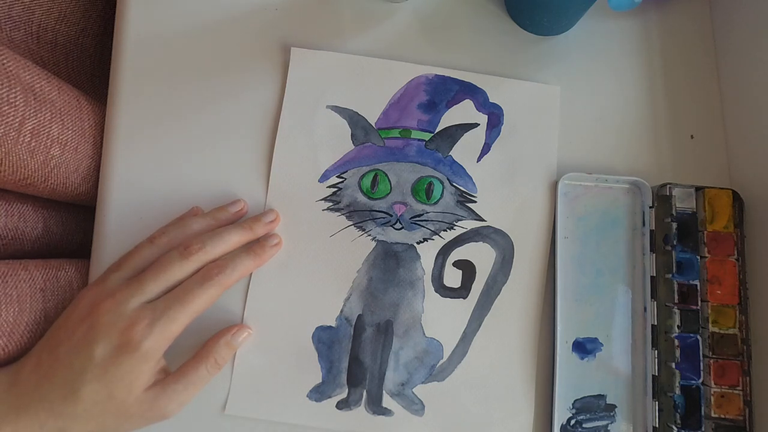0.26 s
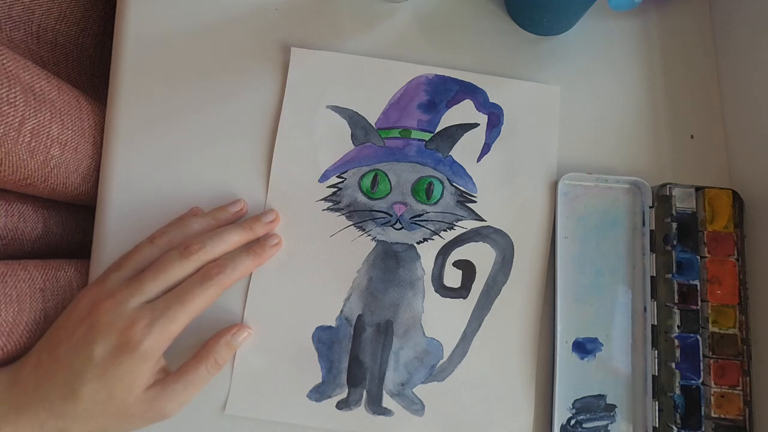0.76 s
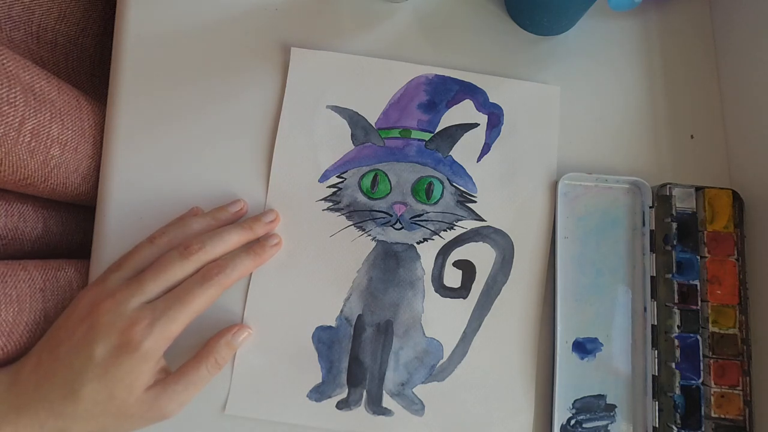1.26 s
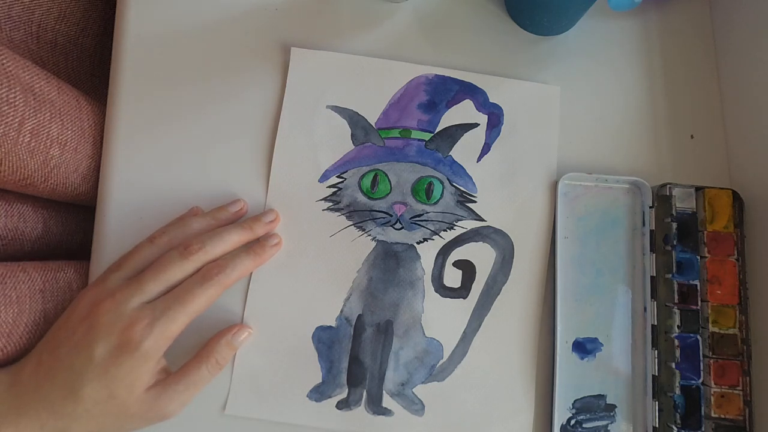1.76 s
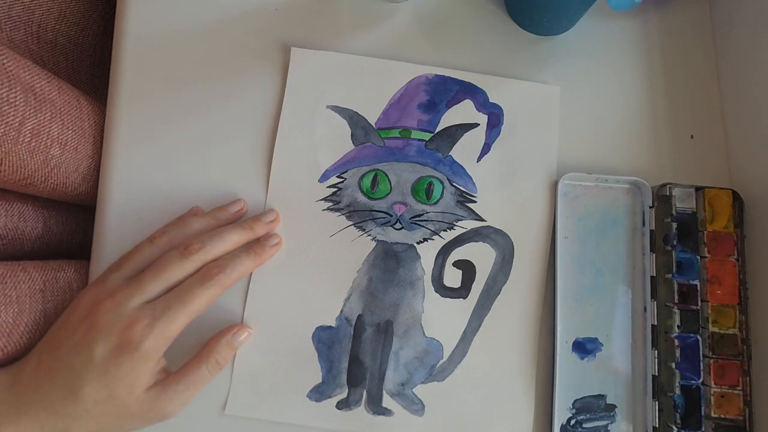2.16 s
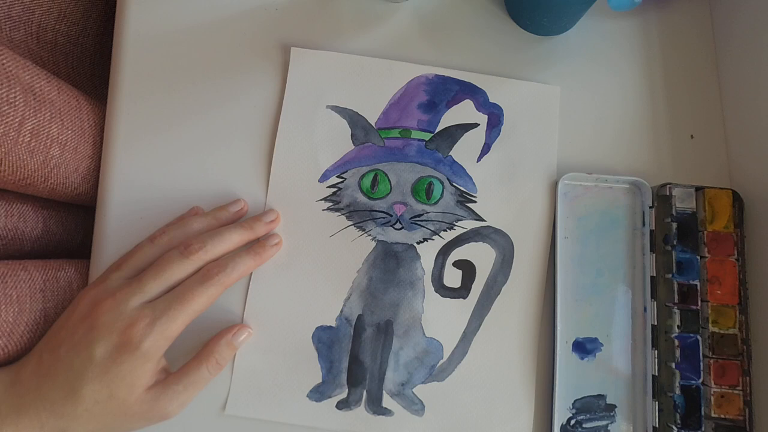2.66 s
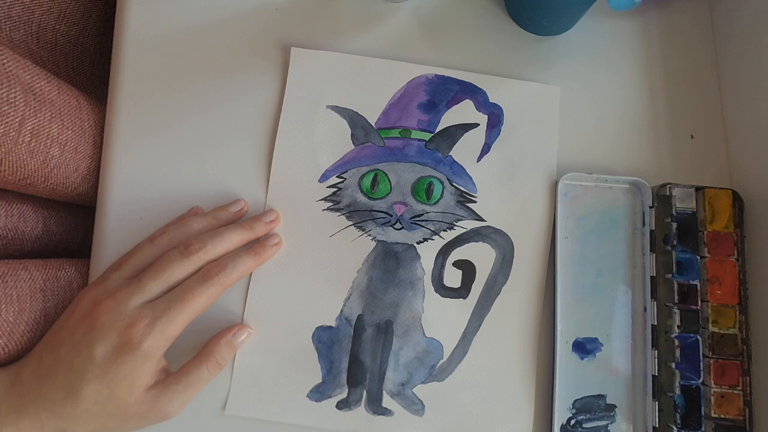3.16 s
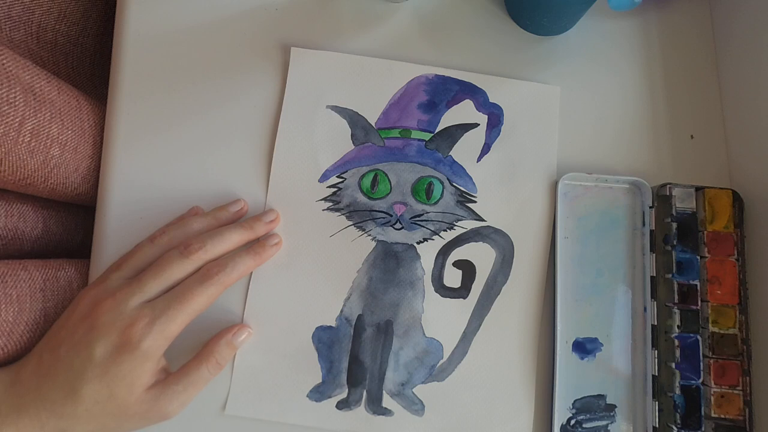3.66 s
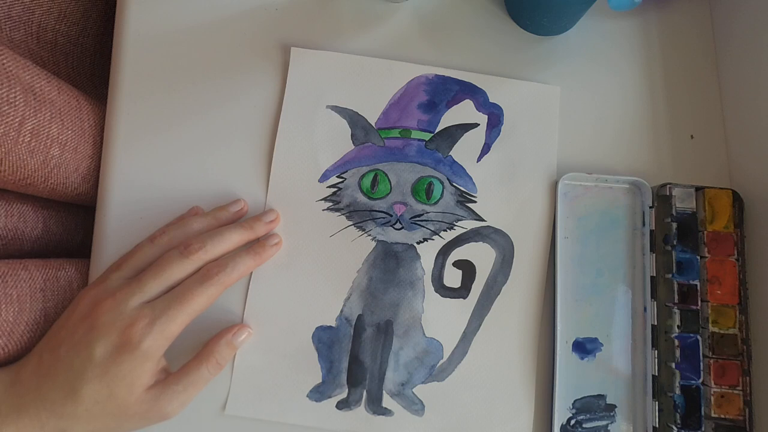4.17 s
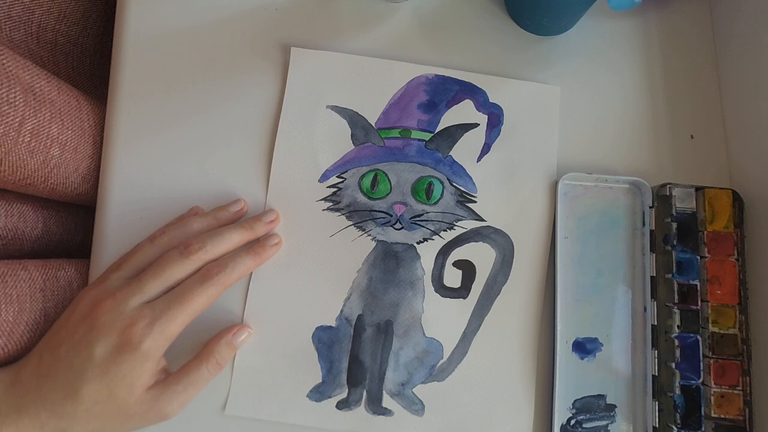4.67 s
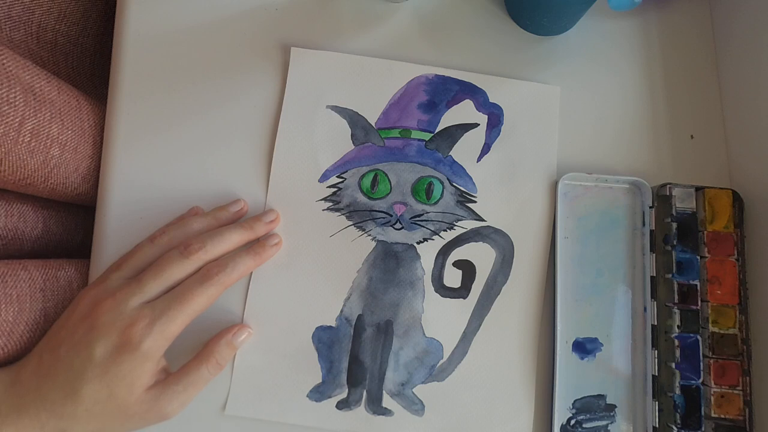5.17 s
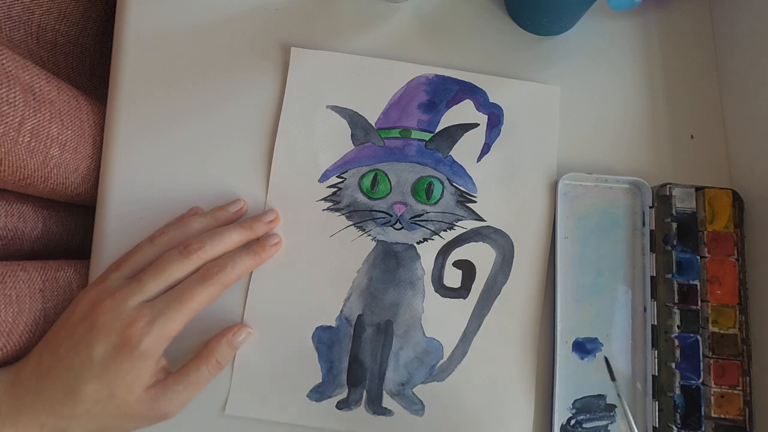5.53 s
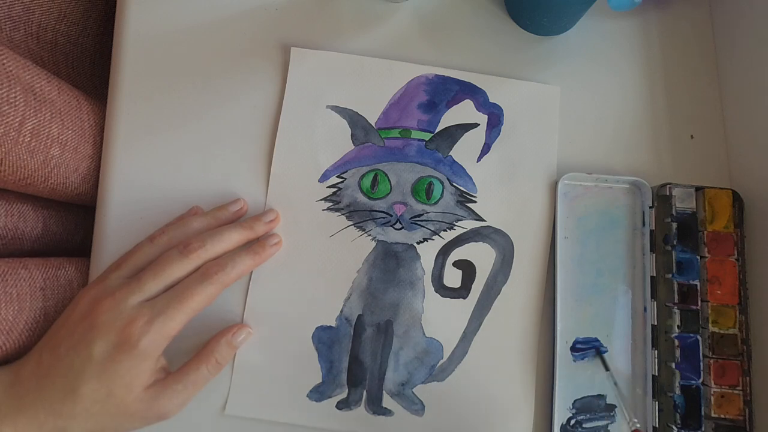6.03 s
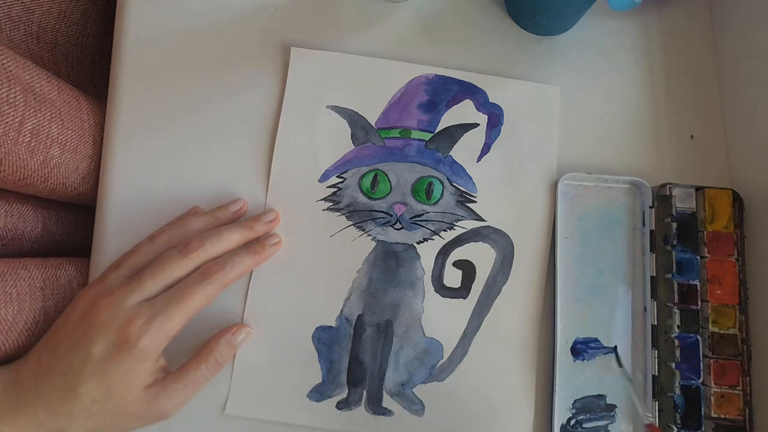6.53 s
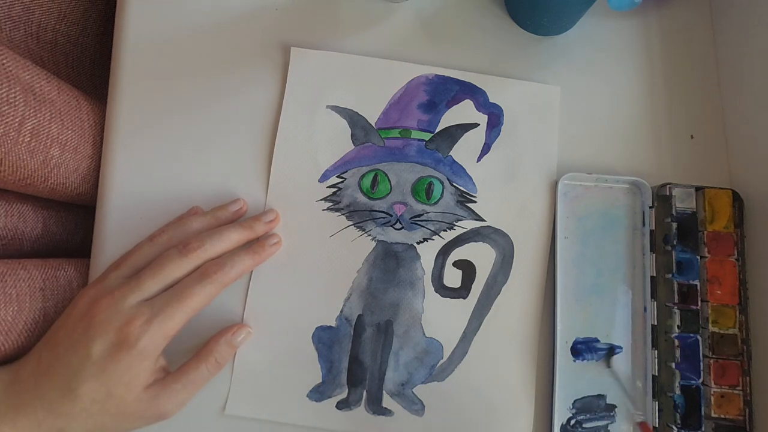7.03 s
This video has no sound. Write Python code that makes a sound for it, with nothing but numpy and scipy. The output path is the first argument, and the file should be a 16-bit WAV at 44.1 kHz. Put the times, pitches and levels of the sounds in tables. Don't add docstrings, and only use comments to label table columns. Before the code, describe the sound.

Close above a desk in a quiet room with a faint fan and low rumble, a sleeve rubs, then a paintbrush stirs in a glass water jar with tiny bubbles and ticks. Sharp bright clinks strike the rim, with soft desk bumps. After a lull, the wet brush dabs evenly on a hollow plastic paint-box lid.

```python
import sys
import numpy as np
from scipy import signal
from scipy.fft import rfft, irfft, next_fast_len
from scipy.io import wavfile
from scipy.ndimage import map_coordinates

SR = 44100
rng = np.random.default_rng(int(sys.argv[2]) if len(sys.argv) > 2 else 0)


def ratio_of_db(decibels):
    return 10 ** (np.asarray(decibels, float) / 20)


def store_wav(level_fs):
    pcm = np.round(np.clip(np.atleast_2d(level_fs), -1, 1) * 32767)
    wavfile.write(sys.argv[1], SR, pcm.T.astype(np.int16))


N = 321930
CLOCK = np.arange(N) / SR
T = np.arange(SR // 2) / SR
SPOTS = 5

# (frequency [Hz], level [dB per Hz])
CRACK_SPECTRUM = [(300, -27.5), (1500, -43), (3000, -14), (5000, -6.5), (6300, -11.5), (8000, -10),
                  (12000, -15.5), (13800, -18.5), (15000, -16.5), (16500, -46.5), (17000, -92)]
# (frequency [Hz], level [dB], t60 [s])
LOWEST_RINGS = [(1472, -33.5, 0.17), (2345, -26, 0.35), (3494, -3, 0.42), (3560, -15, 0.12)]
SECOND_RINGS = [(2600, -27, .26), (3755, -23, .35), (4902, -3.5, 0.33), (4924, -11, .15), (5066, -11, .12),
                (5218, -11, 0.1), (6056, -24, 0.26), (7219, -30, .25)]
HIGH_RINGS = [(7860, 0, 0.05), (8880, -4.5, 0.036), (9590, 3, 0.057), (9400, -14.5, 0.22),
              (11400, -16.5, 0.11), (11250, -10, 0.077), (13090, -16, .09), (14780, -20.5, 0.067)]


def unit(x):
    return x / np.sqrt(np.mean(x ** 2) + 1e-20)


def along(points, hz):
    f, v = np.transpose(points)
    return np.interp(np.log(hz + 1), np.log(f + 1), v)


def curve(rows):
    s, db = np.transpose(rows)
    return ratio_of_db(np.interp(CLOCK, s, db, left=-140, right=-140))


def wobble(rate):
    knots = rng.standard_normal(int(N * rate / SR) + 4)
    return map_coordinates(knots, [np.arange(N) * rate / SR])


def noise(gain, count=N):
    m = next_fast_len(count + 4096)
    spectrum = rfft(rng.standard_normal(m)) * gain(np.fft.rfftfreq(m, 1 / SR))
    return unit(irfft(spectrum, m)[:count])


def peak(hz, width_hz):
    return lambda f: np.exp(-((f - hz) / width_hz) ** 2)


def tent(t, peak_s, rise_db_s, fall_db_s):
    return ratio_of_db(np.minimum(rise_db_s * (t - peak_s), fall_db_s * (peak_s - t)))


def ring(hz, db, t60, attack=0.00018):
    return ratio_of_db(db - 60 * T / t60) * np.sin(2 * np.pi * hz * T) * (1 - np.exp(-T / attack))


def puff(gain, t60, attack=0.0001):
    burst = np.pad(noise(gain, count=4000), (0, len(T) - 4000))
    return burst * ratio_of_db(-60 * T / t60) * (1 - np.exp(-T / attack))


def silent_spots():
    return np.zeros((SPOTS, N + SR))


def add(track, s, sound):
    track[rng.integers(SPOTS), round(s * SR):][:len(T)] += sound


def air_hiss():
    # (frequency [Hz], level [dB per Hz])
    floor = [(26, -17), (48, -4.5), (70, -10.5), (110, -15.5), (185, -19.5), (350, -28), (540, -30.5),
             (1500, -36), (3400, -38.5), (9000, -38.5), (15400, -43.5), (15700, -82.5)]
    return ratio_of_db(-67.5 + .4 * wobble(1.4)) * noise(lambda f: ratio_of_db(along(floor, f)))


def fan():
    # (frequency [Hz], width [Hz], level [dB], unsteadiness [dB])
    rattle = [(4070, 340, -83.5, 0.5), (8700, 700, -95, 10), (11500, 600, -98, 9)]
    phase = 2 * np.pi * CLOCK
    hum = ratio_of_db(-68.0 + .8 * wobble(4.1)) * np.sin(129 * phase + .5 * wobble(13))
    turn = ratio_of_db(4.3 * np.cos(32.5 * phase + 1.5 * wobble(4)))
    flutter = 1.5 * np.tanh(wobble(22) / 1.5 - .3)
    whir = sum(ratio_of_db(db + loose_db * flutter) * noise(peak(hz, width_hz))
               for hz, width_hz, db, loose_db in rattle)
    return hum + turn * whir


def building():
    # (time [s], level [dB])
    swell = [(0, -57.5), (.3, -60), (.6, -67), (1.5, -62.5), (1.95, -60), (2.3, -59), (2.64, -62.5),
             (2.74, -53.5), (3.24, -62), (3.38, -50), (3.76, -60.5), (3.98, -55), (4.24, -58), (4.5, -47.5),
             (4.9, -65.5), (5.5, -60), (6.8, -59), (7.3, -68.5)]
    drone = .85 * np.sin(33.5 * 2 * np.pi * CLOCK + .8 * wobble(2.5))
    rumble = .4 * noise(peak(30, 13)) + .45 * noise(peak(8, 8))
    return curve(swell) * ratio_of_db(3.0 + 1.1 * wobble(4.1)) * (drone + rumble)


def arm():
    settling = tent(CLOCK, peak_s=0.85, rise_db_s=103, fall_db_s=73)
    rub = noise(lambda f: peak(150, 75)(f) + 0.1 * peak(400, 200)(f))
    return ratio_of_db(-58) * settling * unit(ratio_of_db(4.2 * wobble(30)) * rub)


def wipes():
    # (time [s], level [dB], frequency [Hz], fade [dB/s])
    slides = [
        (5.5, -80.5, 3000, 39.5),
        (5.84, -71.5, 8000, 201),
    ]
    out = np.zeros(N)
    for s, db, hz, fade in slides:
        grain = ratio_of_db(db + 3.3 * wobble(43))
        out += grain * tent(CLOCK, s, fade, fade) * noise(peak(hz, hz))
    return out


def desk():
    # (time [s], low level [dB], middle level [dB], high level [dB], share of ring time [0-1])
    contacts = [(1.718, -60, -91, -74.5, 0.4), (1.839, -48.5, -90, -75, 0.1), (1.925, -54, -60, -77, 0.3),
                (2.023, -63, -83, -70, 0.17), (2.19, -49.5, -82, -66, 0.08), (2.619, -56, -79, -99, 0.46),
                (2.802, -37, -41.5, -52, 0.07), (2.983, -43.5, -52.5, -59, 0.27),
                (3.285, -35, -43.5, -72.5, 0.3), (3.648, -48.5, -44, -68, 0.5), (3.695, -47, -53, -76, 0.3),
                (4.026, -58.5, -54.5, -71, 0.48), (4.451, -51.5, -54, -49.5, 1),
                (4.735, -69, -66.5, -82.5, 0.55), (5.003, -76.5, -76, -70, 0.76),
                (5.013, -74, -67, -75, 0.84), (5.821, -70, -66.5, -73.5, .6)]
    # (frequency [Hz], level [dB], t60 [s])
    wood_modes = [(203, -6, 0.04), (278.6, 6.5, 0.045), (404, 5.5, 0.061), (492, -10.5, 0.22),
                  (823.5, -8, 0.16)]
    out = silent_spots()
    for s, low_db, middle_db, high_db, share in contacts:
        wood = sum(ring(hz, level + low_db - 3 + rng.normal(0, 1.7), share * t60, attack=0.002)
                   for hz, level, t60 in wood_modes)
        knock = ratio_of_db(middle_db - 3.5) * puff(peak(1500, 1800), 0.049, attack=0.00049)
        tick = ratio_of_db(high_db + 6) * puff(peak(8000, 4500), 0.036)
        add(out, s, wood + knock + tick)
    return out


def lid():
    # (time [s], level [dB])
    dabs = [
        (6.003, -51.5),
        (6.169, -52.5),
        (6.332, -50),
        (6.499, -49.5),
        (6.655, -45),
        (6.809, -47),
        (6.972, -48.5),
        (7.131, -47),
        (7.291, -46.5),
    ]
    # (frequency [Hz], level [dB], t60 [s])
    body_modes = [(313, -0.5, 0.07), (402, 6, 0.026), (477, 0.5, 0.05), (532, -5.5, 0.082),
                  (687, -8, 0.047), (733, -8, 0.027)]
    top_modes = [(1340, 5, 0.033), (1613, -1, 0.057), (2055, 10.5, .015), (2710, -15.5, .01),
                 (4870, 5, 0.01)]
    bright_db = -16.5
    out = silent_spots()
    for s, db in dabs:
        boom = sum(ring(hz, level + rng.normal(0, .9), t60, attack=0.0015)
                   for hz, level, t60 in body_modes)
        tick = sum(ring(hz, level + bright_db + rng.normal(0, 0.65), t60)
                   for hz, level, t60 in top_modes)
        splat = ratio_of_db(-4) * puff(peak(535, 294), 0.055, attack=0.002)
        splat += ratio_of_db(bright_db - 0.5) * puff(peak(1560, 2800), 0.089)
        late_boom = np.roll(boom, 50)
        add(out, s + .0006, ratio_of_db(db - 4.5) * (late_boom + tick + splat))
    return out


def water():
    # (time [s], level [dB], frequency [Hz])
    bubbles = [(1.931, -62, 1427), (2.004, -68.5, 1344), (2.079, -51, 1534), (2.08, -59, 1340),
               (2.114, -50, 1380), (2.114, -61.5, 2010), (2.115, -63, 1486), (2.133, -62, 1340),
               (2.237, -48.5, 1550), (2.239, -54.5, 1414), (2.264, -66, 1650), (2.28, -64, 1590),
               (2.302, -60, 1556), (2.324, -58.5, 1550), (2.326, -61, 1340), (2.325, -61, 1870),
               (2.348, -59.5, 1628), (2.374, -65, 1690), (2.384, -62, 1764), (2.39, -67, 1410),
               (2.402, -63, 1884), (2.429, -71, 1750)]
    out = silent_spots()
    for s, db, hz in bubbles:
        t60 = 0.073 * (1500 / hz) ** 1.5
        tremble = .75 * noise(peak(0, 70), len(T))
        phase = 2 * np.pi * hz * (T + .5 * T ** 2) + tremble
        add(out, s, ratio_of_db(db - 60 * T / t60) * (1 - np.exp(-T / 0.0024)) * np.sin(phase))
    return out


def wall(family):
    return sum(ring(hz, level + rng.normal(0, 0.5), t60) for hz, level, t60 in family)


def rocking_jar():
    # (time [s], level [dB], split [Hz], t60 [s])
    swells = [
        (2.97, -63, 1.5, .5),
        (3.745, -62, 3.6, .48),
    ]
    hz = 4902
    out = silent_spots()
    for s, db, split_hz, t60 in swells:
        first = ring(hz, db, t60, attack=.01)
        second = ring(hz + split_hz, db - 2, t60, attack=.01)
        add(out, s, first + second)
    return out


def slips():
    # (time [s], low rings [dB], high rings [dB])
    scrapes = [
        (2.876, -39, -59.5),
        (2.96, -81, -56.5),
    ]
    run_up_s, slope_db_s = 0.1, 352
    grip = ratio_of_db(-60 * T / .2)
    grit = rng.standard_normal(len(T)) * (rng.random(len(T)) < .06)
    scratch = ratio_of_db(17.5) * puff(lambda f: ratio_of_db(along(CRACK_SPECTRUM, f)), 0.0035)
    low = grip * (wall(SECOND_RINGS) + 0.2 * wall(LOWEST_RINGS))
    high = wall(HIGH_RINGS) + scratch
    push = grit * ratio_of_db(-16.5) * tent(T, run_up_s, slope_db_s, slope_db_s)
    out = silent_spots()
    for s, low_db, high_db in scrapes:
        glass = ratio_of_db(low_db) * low + ratio_of_db(high_db) * high
        add(out, s - run_up_s, signal.fftconvolve(push, glass)[:len(T)])
    return out


def single_modes():
    # (time [s], level [dB], frequency [Hz])
    touches = [(1.916, -51, 3210), (2.004, -63.5, 2580), (2.082, -54, 10350), (2.118, -63, 7560),
               (2.196, -53, 4936), (2.197, -58, 6800), (2.230, -53.5, 3494), (2.232, -56, 4230),
               (2.259, -51.5, 8880), (2.261, -62, 9590), (2.337, -57, 8500), (2.351, -61, 3494),
               (2.367, -71, 10100), (2.380, -67, 8880), (2.391, -60, 8880), (2.417, -64, 10600),
               (2.429, -64, 4530), (2.428, -64, 9000), (2.457, -68, 8880), (2.468, -68, 6900),
               (2.534, -66, 8840), (2.538, -71.5, 3494), (4.4515, -54, 5085), (4.454, -49, 5250),
               (4.736, -67, 5280), (5.006, -64, 5200)]
    # (frequency [Hz], t60 [s])
    held_wall = [(3250, .035), (3494, .13), (4300, 0.036), (4905, 0.15), (5150, 0.045), (7000, 0.017),
                 (8900, 0.044), (10300, 0.017)]
    # (time [s], level [dB], frequency [Hz], t60 [s])
    favoured = [(1.938, -41, 11130, 0.023), (2.801, -57, 13090, 0.11), (2.803, -39, 9590, .1),
                (2.804, -39.5, 8880, 0.11), (3.285, -46, 9590, 0.066), (3.289, -49, 11250, 0.16),
                (3.6504, -29.5, 8880, 0.061), (3.6489, -35, 9590, 0.062), (3.652, -44, 5055, .09),
                (3.697, -28.5, 9590, 0.051), (2.938, -59, 8880, .2), (4.453, -61.5, 404, 0.29)]
    held = [(s, db, hz, along(held_wall, hz)) for s, db, hz in touches]
    out = silent_spots()
    for s, db, hz, t60 in list(favoured) + held:
        contact = ratio_of_db(db - 2.5) * puff(peak(hz, 0.27 * hz), 0.01497)
        add(out, s, ring(hz, db, t60) + contact)
    return out


def blows():
    # (time [s], crack [dB], then against the crack: lowest ring, second ring, high rings [dB])
    knocks = [
        (1.9251, -25, -38.5, -15.5, -41),
        (2.8007, -16.5, -17.5, -12, -25),
        (3.2851, -16, -27, -17, -36),
        (3.6484, -12.5, -48, -32.5, -13),
        (3.6944, -19, -50.5, -19.5, -25.5),
    ]
    # (delay [s], level [dB])
    bounce = [(0, 1), (.0008, -12), (.0034, -8.5), (.006, -15.5)]
    f = np.fft.rfftfreq(2048, 1 / SR)
    lead_s = 40 / SR
    echoes = sum(ratio_of_db(level) * np.exp(-2j * np.pi * f * (lag + lead_s)) for lag, level in bounce)
    out = silent_spots()
    for s, db, low_db, second_db, high_db in knocks:
        bright = peak(9000 + 43 * (low_db + 49.5), 2200)
        colour = lambda hz: ratio_of_db(along(CRACK_SPECTRUM, hz)) * (.6 + 2.4 * bright(hz))
        snap = irfft(colour(f) * echoes)[:900]
        crack = ratio_of_db(-12.5) * puff(colour, 0.032)
        crack[:len(snap)] += ratio_of_db(5.5) * snap / np.abs(snap).max()
        rings = ratio_of_db(low_db) * wall(LOWEST_RINGS) + ratio_of_db(second_db) * wall(SECOND_RINGS)
        rings += ratio_of_db(high_db) * wall(HIGH_RINGS)
        foot_thud = ring(305, -35, 0.058)
        add(out, s - lead_s, ratio_of_db(db) * (rings + foot_thud + crack))
    return out


def walls(spots, wet_db):
    # (frequency [Hz], t60 [s])
    decay = [(200, 0.37), (1500, 0.38), (5000, 0.33), (10000, 0.21), (16000, 0.31)]
    hz, t, z = signal.stft(rng.standard_normal((SPOTS, len(T))), SR, nperseg=256)
    tails = signal.istft(z * ratio_of_db(-60 * t / along(decay, hz)[:, None]), SR, nperseg=256)[1]
    tails = np.pad(tails / np.linalg.norm(tails[0]), ((0, 0), (130, 0)))
    wet = signal.fftconvolve(spots, tails, axes=1)[:, :N]
    return (spots[:, :N] + ratio_of_db(wet_db) * wet).sum(0)


def scene():
    room = air_hiss() + fan() + building()
    jar = rocking_jar() + slips() + single_modes() + blows()
    near = walls(desk() + water() + jar, wet_db=-8.5)
    mono = room + arm() + wipes() + walls(lid(), wet_db=-12.5) + near
    return np.array([mono, mono])


def top_cut(x):
    return signal.sosfilt(signal.butter(12, 16550, fs=SR, output="sos"), x)


def record(dry):
    trace = ratio_of_db(-89) * noise(lambda f: (f < 9600) * (1 + 30 * peak(45, 35)(f)))
    mix = dry + np.array([trace, -trace]) - .0004
    return top_cut(mix)


dry = scene()
out = record(dry)
store_wav(out)
```